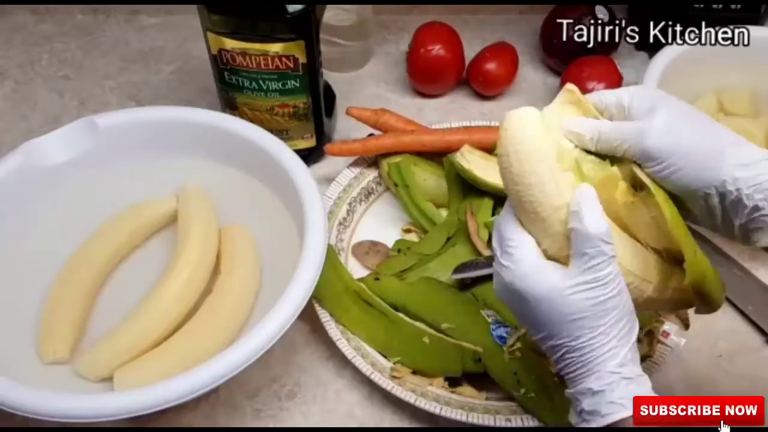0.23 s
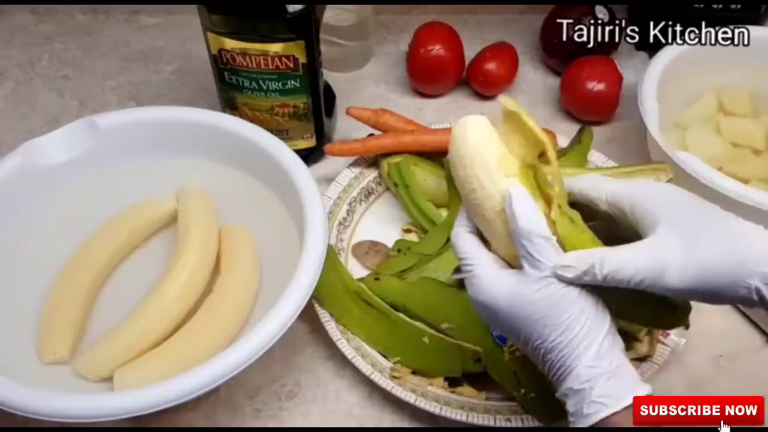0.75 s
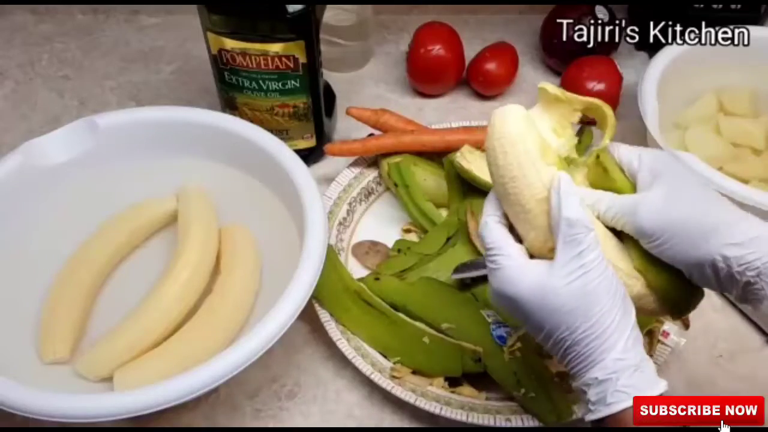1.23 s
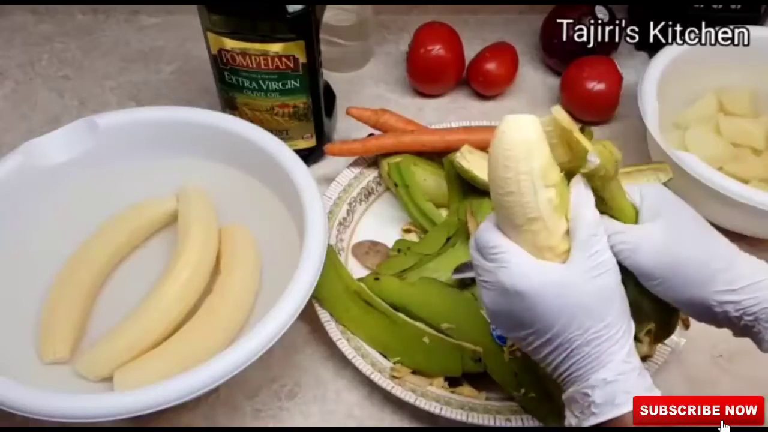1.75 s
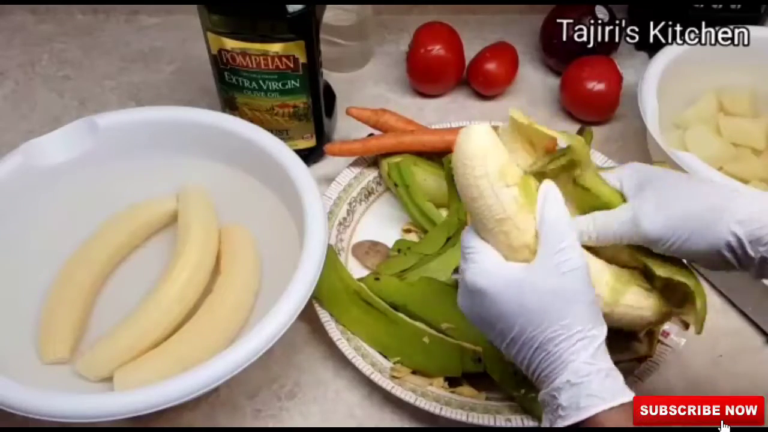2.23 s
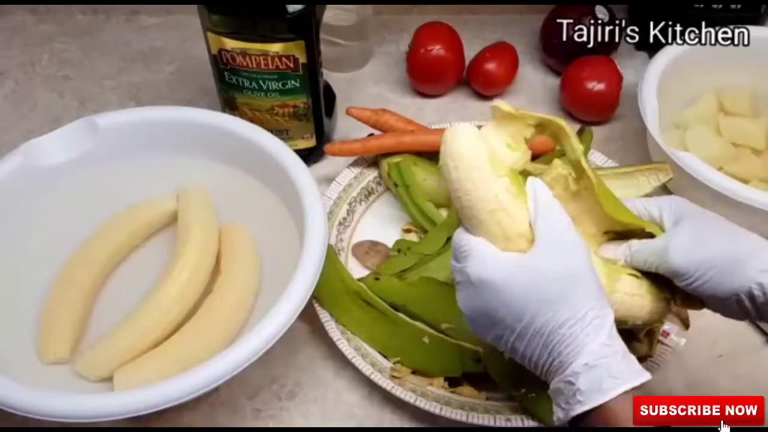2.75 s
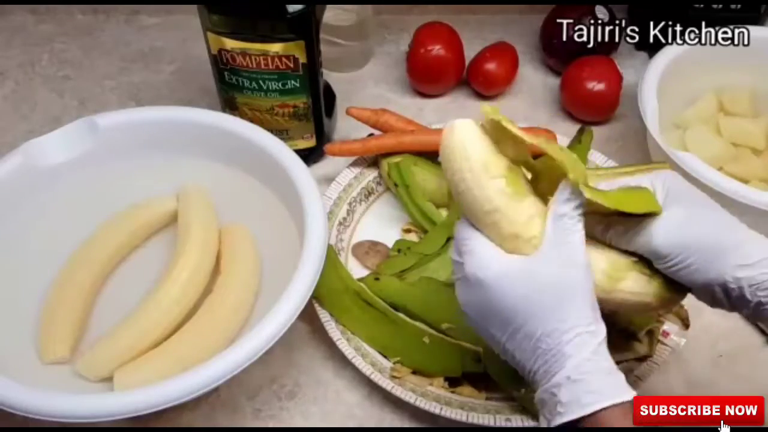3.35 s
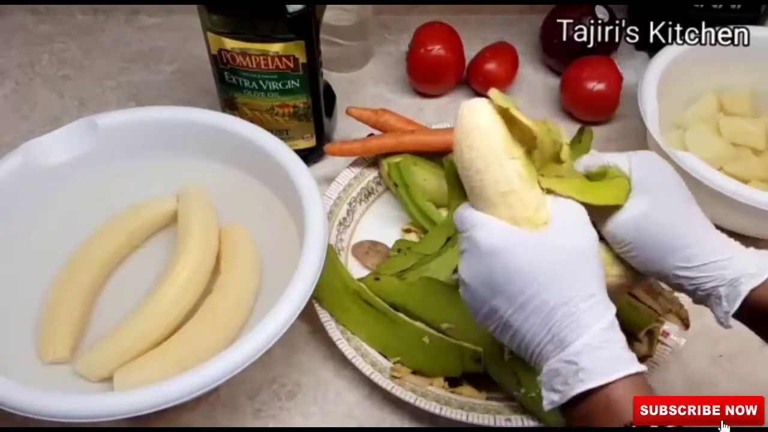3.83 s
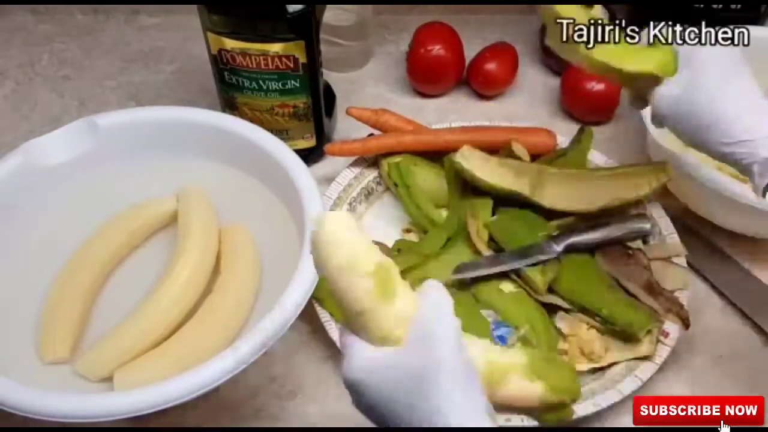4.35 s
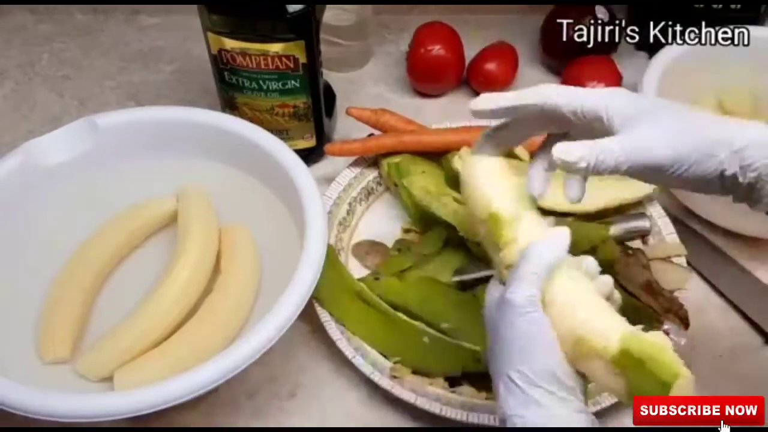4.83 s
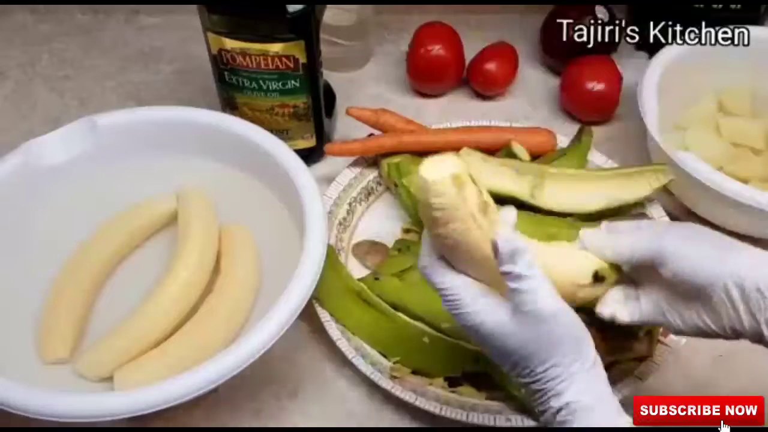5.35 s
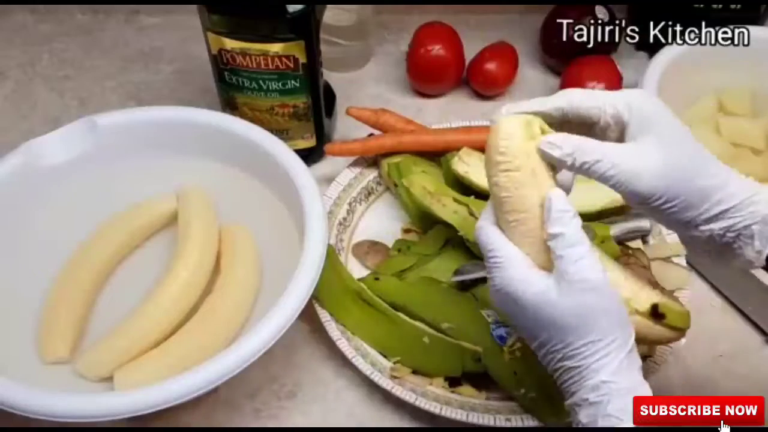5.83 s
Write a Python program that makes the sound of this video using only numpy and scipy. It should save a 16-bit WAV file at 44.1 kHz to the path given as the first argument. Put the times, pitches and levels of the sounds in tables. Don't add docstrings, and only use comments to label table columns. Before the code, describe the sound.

Gloved hands rip thick green skin off a plantain in crackling, snapping bursts, close up in a kitchen, over a low unsteady appliance rumble.

```python
import sys
import numpy as np
from scipy import signal
from scipy.fft import rfft, irfft, next_fast_len
from scipy.io import wavfile
from scipy.ndimage import uniform_filter1d

SR = 44100
rng = np.random.default_rng(int(sys.argv[2]) if len(sys.argv) > 2 else 0)


def master_out(mix):
    frames = np.transpose(np.atleast_2d(mix))
    ceiling = np.clip(frames, -1, 1)
    pcm = np.round(ceiling * 32767).astype(np.int16)
    wavfile.write(sys.argv[1], SR, pcm)


def boost(x):
    u = np.asarray(x, float) / 20
    return 10 ** u


N = 269010

# t/s, peak level/dB, time to gain 20 dB/s,
# time to lose 20 dB/s
STROKES = [(0.0, -37, .02, 0.045), (.04, -36.5, 0.018, 0.071), (.118, -23, 0.017, 0.09),
           (.33, -39, 0.016, 0.13), (.394, -37.5, 0.072, 0.035), (.558, -50, 0.047, 0.26),
           (.788, -49.5, 0.089, 0.31), (.945, -43, 0.01, 0.058), (1.12, -51, 0.067, 0.43),
           (1.215, -54, .015, 0.24), (1.304, -33, 0.13, 0.21), (1.654, -42.5, 0.16, 0.26),
           (1.906, -39, 0.035, 0.3), (2.055, -34, 0.074, 0.15), (2.184, -37.5, .025, 0.035),
           (2.225, -52.5, .04, 0.99), (2.42, -44, 0.023, 0.11), (2.484, -40.5, 0.1, 0.063),
           (2.694, -50.5, 0.0054, 0.15), (2.828, -33.5, 0.06, 0.053), (2.904, -35, 0.061, 0.073),
           (3.006, -28.5, 0.06, 0.065), (3.242, -52, 0.97, 0.12), (3.412, -42.5, 0.047, 0.075),
           (3.61, -40.5, 0.088, 0.14), (3.65, -35, 0.05, 0.089), (3.81, -57, .012, .08),
           (3.868, -43, 0.02, 0.15), (4.078, -38.5, 0.3, 0.26), (4.15, -41.5, 0.79, 0.18),
           (4.24, -30.5, 0.11, 0.088),
           (4.52, -61.5, 0.35, 0.39),
    (4.65, -54.5, 0.024, 0.43),
    (4.98, -56.5, 0.024, .15),
    (5.131, -42.5, 0.15, 0.031),
    (5.238, -52.5, 0.48, 0.17),
    (5.4, -60, 0.16, 0.47),
    (5.536, -50.5, 0.15, 0.064),
    (5.96, -50, 0.1, .2),
    (6.008, -45.5, 0.061, 0.061),
    (6.07, -42.5, 0.02, .3),
]
# t/s, peak level/dB, time to gain 20 dB/s, time to lose 20 dB/s
TEARS = [(.05, -51.5, 0.058, 0.13), (.125, -25.5, 0.017, 0.11), (.39, -33, 0.063, 0.057),
         (.6, -60.5, 0.9, 0.29), (.87, -57.5, 0.14, 1), (1.225, -34.5, 0.018, 0.39), (1.31, -33, 0.16, 0.2),
         (1.41, -40, .1, 0.063), (1.68, -59, 0.33, 0.42), (1.93, -52, 0.023, 0.1), (2.05, -24, 0.023, 0.11),
         (2.11, -46.5, .05, 0.43), (2.19, -42, .1, 0.083), (2.5, -47.5, 0.85, 0.079),
         (2.8, -35, 0.029, 0.11), (2.84, -37, 0.04, 0.033), (2.9, -30, 0.013, 0.029),
         (2.98, -28, .025, 0.034), (3.01, -21.5, .03, 0.023), (3.04, -38, .03, 0.13),
         (3.25, -47.5, 0.12, 0.057), (3.41, -45, 0.048, 0.091), (3.65, -34.5, 0.064, 0.13),
         (4.18, -37.5, 0.2, .1), (4.23, -21, 0.044, 0.074), (4.7, -50.5, 0.063, 0.1),
         (5.15, -58.5, 0.44, 0.5), (5.52, -63, 0.43, 0.24), (6.1, -48.5, 0.19, .1)]
# t/s, left over right level/dB
PLACE = [(0.0, -0.5), (0.44, 1.5), (1.07, -0.5), (2.62, 0), (2.74, -0.5), (2.79, 0), (3.79, 0.5),
         (4.4, 1.0), (4.45, 0), (5.39, -0.5), (5.72, 2.5), (6.1, -0.5)]
# f/Hz, level per Hz/dB
RUSTLE = [(1530, -24.5), (2600, -8), (2910, -12), (3420, -7.5), (4560, -3.5), (8200, -3.5), (14900, -4.5),
          (16000, -9.5)]
# f/Hz, width/Hz, level/dB
FRUIT = [(1080, 455, 2), (1149, 273, 6), (1600, 650, -3), (2048, 261.4, 0.5), (2350, 266, -2.5),
         (2876, 360, -3), (3520, 870, -7)]
# f/Hz, width/Hz, level/dB
HOLLOW = [(435.5, 74, 8.5), (589, 89, 3), (748, 40, 1), (870, 210, -6.5)]
GLOVE_REST_DB, RIP_REST_DB = -82, -70
FLEX_DB, FLEX_FOLLOWS = -73.5, 0.17

# t/s, peak level/dB, time to fade 60 dB/s, f/Hz
TICKS = [(.3235, -51, 0.059, 2040), (0.5545, -51, 0.053, 3940), (0.944, -45.5, 0.05, 3850),
         (1.092, -55.5, 0.067, 3000), (1.4073, -43, 0.095, 1110), (1.4593, -41.5, 0.033, 1850),
         (1.8627, -60, .04, 2110), (2.2127, -42.5, 0.058, 1750), (2.6925, -49.5, 0.025, 1190),
         (2.733, -48.5, 0.023, 1420), (4.206, -35.5, 0.05, 1840), (4.252, -34.5, 0.084, 1650),
         (4.669, -50.5, 0.034, 2840), (4.9795, -55, 0.051, 4290), (5.081, -50, 0.11, 4450),
         (5.886, -64, .062, 4430), (6.062, -41.5, 0.14, 3770)]
# t/s, peak level/dB, time to fade 60 dB/s, f/Hz
RIPS = [(0.0363, -32, 0.087, 4170), (0.11, -19.5, 0.021, 3900), (.122, -20, 0.15, 1300),
        (0.1831, -24.5, 0.061, 2780), (.346, -36, 0.13, 2100), (0.3946, -27, 0.026, 1700),
        (1.209, -31.5, 0.071, 1610), (1.2334, -23, 0.06, 3000), (1.2699, -21.5, 0.08, 1670),
        (1.3054, -24, 0.04, 1150), (1.5685, -49, .04, 3990), (1.9021, -37.5, 0.036, 2410),
        (2.05, -28, 0.057, 2200), (2.14, -30, 0.09, 1630), (2.4795, -35, 0.079, 2410),
        (2.7794, -27.5, 0.093, 1283), (3.237, -36, 0.048, 1530), (3.568, -54, 0.036, 1730),
        (3.598, -28.5, 0.14, 1600), (4.2191, -20, 0.12, 1460)]
# t/s, peak level/dB, time to fade 60 dB/s, f/Hz
SNAPS = [(1.335, -15, 0.07, 1560), (1.3734, -28.5, 0.075, 1900), (2.029, -41, .04, 1780),
         (2.043, -8, 0.07, 1900), (2.099, -20.5, 0.039, 1220), (2.104, -21.5, 0.036, 1950),
         (2.1782, -15, 0.031, 1940), (2.789, -19, 0.054, 1380), (2.8423, -23.5, 0.075, 1200),
         (2.9034, -16, 0.061, 1200), (2.9094, -19.5, 0.026, 1030), (2.973, -17, 0.05, 1760),
         (2.9799, -11.5, 0.16, 1320), (3.523, -41, 0.062, 2120)]
# t/s, peak level/dB, time to fade 60 dB/s, f/Hz
POPS = [
    (2.7756, -39, .031, 1260),
    (2.8244, -21, 0.063, 2500),
    (2.8887, -36, .049, 2220),
    (2.9922, -25, 0.017, 2370),
    (3.0029, -14, 0.028, 1590),
    (3.0098, -19, .05, 2350),
    (3.3838, -48, 0.055, 1780),
    (3.6408, -22.5, 0.11, 1580),
]
# bright spray re peak level/dB, hollow knock re peak level/dB
BLEND = [
    (3, -13.5),
    (-11, -19),
    (-23, -16.5),
    (-11.5, -8.5),
]

# t/s, peak level/dB, f/Hz, left over right level/dB
PINGS = [(0.0427, -41.5, 2780, 1), (0.122, -15.5, 2030, 1), (0.3486, -37.0, 1920, -2),
         (0.3672, -34.0, 2210, -1), (0.443, -45.0, 1710, 5), (0.8456, -50.0, 1810, -6),
         (0.8951, -48.0, 1690, -6), (0.9521, -47.0, 2290, -6), (1.2111, -30.0, 2140, -2),
         (1.3542, -31.5, 1860, -3), (1.4083, -30.5, 2130, -2), (1.4632, -37.0, 2290, 4),
         (1.9554, -33.5, 2270, -4), (2.0275, -30.0, 2100, 1), (2.1566, -30.5, 2320, 0),
         (2.3387, -42.0, 2060, -2), (2.3637, -42.5, 1930, 1), (2.454, -39.5, 2430, -6),
         (2.7741, -38.5, 1790, 1), (2.8429, -20.0, 1840, 2), (2.989, -14.5, 2180, -2),
         (3.0032, -11.5, 1760, 1), (3.2132, -47.5, 1660, 0), (3.2314, -43.0, 1730, 1),
         (3.4017, -44.0, 1610, 0), (3.5292, -47.5, 1710, -2), (3.5665, -34.0, 1760, -2),
         (3.5893, -30.5, 1990, -1), (3.5976, -24.0, 1980, 0), (3.6048, -27.5, 2000, -1),
         (3.6176, -29.5, 1700, 0), (3.6293, -29.0, 1610, 1), (3.6436, -25.0, 1600, -1),
         (3.6806, -33.5, 1710, 6), (3.9285, -43.5, 1890, -2), (4.2203, -24.0, 1950, -3),
         (4.6668, -49.5, 2520, -2), (4.6937, -47.5, 2710, 2), (4.697, -46.0, 2760, -6),
         (5.0986, -44.0, 2690, -1)]
# t/s, peak level/dB, left over right level/dB
PRICKS = [(0.0346, -28.0, -6), (0.038, -24.0, -4), (0.0456, -30.0, -6), (0.0739, -33.0, -5),
          (0.0969, -28.0, -5), (0.1237, -14.5, -6), (0.317, -39.5, -4), (0.3449, -31.0, -2),
          (0.3992, -26.5, 6), (0.5556, -30.0, 0), (0.5634, -36.0, -2), (0.6283, -46.0, -1),
          (1.111, -41.0, -4), (1.2108, -24.5, -2), (1.3743, -26.5, -6), (1.4116, -25.5, -6),
          (1.5682, -41.0, -5), (1.8445, -46.5, 0), (1.8632, -41.5, -6), (2.0996, -26.5, 1),
          (2.1869, -28.0, -1), (2.2227, -27.0, -6), (2.6011, -48.5, -2), (2.6341, -50.0, -6),
          (2.6575, -43.5, -6), (2.6922, -29.0, -1), (2.7199, -40.5, -4), (2.7326, -27.0, -6),
          (2.7743, -33.5, -5), (2.8285, -18.0, -5), (3.1267, -42.0, -6), (3.2091, -42.0, -5),
          (3.2339, -38.5, -4), (3.6068, -27.5, -1), (3.7322, -33.0, -6), (3.8049, -39.0, -6),
          (3.8243, -39.5, -6), (3.8388, -33.5, -6), (3.8646, -32.5, -6), (4.7526, -45.5, 1),
          (4.9694, -48.5, -6), (5.0989, -33.5, -6), (5.2583, -44.0, -2), (5.8864, -45.5, -1),
          (5.9024, -44.5, -3), (5.9211, -42.0, 2), (5.9426, -37.0, 0), (5.9687, -33.0, 0),
          (5.982, -30.0, -5), (6.0019, -28.0, -4), (6.0968, -27.5, -3)]
# t/s, peak level/dB, f/Hz, left over right level/dB
BREAKS = [
    (1.305, -20, 1500, 0),
    (1.3355, -19, 1600, 0),
    (2.0418, -6, 2200, -2),
    (2.0992, -21, 1500, -1),
    (2.1785, -18, 2000, -1),
    (2.7878, -22, 1500, 0),
    (2.9035, -18, 1400, 0),
    (2.9793, -16, 1500, 0),
    (.3955, -30, 1700, 2),
]
PING_WIDTH_HZ, PING_BREAK_S, PING_DB = 800, .0003, 1
PRICK_HZ, PRICK_BREAK_S, PRICK_DB = 5000, .0005, 3

# start t/s, end t/s, f/Hz, width/Hz, level/dB
RUBS = [(0.777, 0.943, 1750, 700, -61), (1.58, 1.7, 4620, 1800, -47.5), (1.879, 2.026, 2134, 1300, -45),
        (2.303, 2.502, 1600, 500, -63), (3.535, 3.71, 1773, 1130, -45.5), (3.84, 4.23, 1870, 1370, -51.5),
        (4.866, 5.294, 1550, 58.8, -71), (5.054, 5.263, 2426, 905, -57.5), (5.8, 5.88, 5480, 3000, -60.5),
        (5.92, 6.045, 12500, 6000, -50), (0.528, 0.603, 5600, 2200, -53.5), (.72, .84, 6000, 3000, -55),
        (1.09, 1.2, 12000, 5000, -54.5), (2.633, 2.675, 11000, 5000, -60), (3.645, 3.694, 12000, 3000, -40),
        (3.803, 3.865, 10500, 5000, -50), (5.918, 6.032, 6600, 1500, -48), (0.066, 0.116, 5000, 4000, -45),
        (6.054, 6.1, 11500, 5000, -43), (1.25, 1.41, 4000, 2500, -45), (4.19, 4.283, 4000, 2500, -41.5)]
# t/s, peak level/dB, f/Hz
THUDS = [
    (2.998, -36, 200),
    (4.215, -31, 60),
    (4.728, -26, 70),
]

LAG_SAMPLES = 4
SHADOW_HZ, SHADOW_SHARE = 8000, .3
KITCHEN_T60_S, WALL_CUT_HZ, KITCHEN_DB = 0.32, 5900, -14.5

# t/s, drone level/dB, time to gain or lose 20 dB/s, upper rumble re drone level/dB
SURGES = [(.08, -48, 0.23, 3), (.22, -36.5, 0.03, -15), (.34, -39, 0.2, -12), (.58, -53.5, 1, 0),
          (.95, -53.5, 3.5, -4), (1.14, -43, 0.54, -8), (1.43, -42, 0.2, -14), (1.61, -36, 0.24, -14),
          (1.83, -39, 0, -13.5), (1.95, -46, 0.43, -11), (2.36, -47.5, 0.3, -7.5), (2.52, -54, 0.5, -6),
          (3.05, -52.5, 0.23, -1), (3.361, -51, 0.5, -4.5), (3.518, -49.5, -0.9, -14),
          (3.8, -46, 0.17, -5.5), (4.04, -40, .1, -14.5), (4.26, -36, .1, -17), (4.47, -50, 0.57, -24),
          (4.538, -34, 0.1, -26.5), (4.74, -39.5, 0.05, -2), (4.94, -33, -0.02, -12),
          (5.19, -46, 0.84, -7.5), (5.33, -39, -0.3, -9.5), (5.39, -49, -0.26, 5), (5.62, -23.5, -2, -1),
          (5.828, -41.5, 0.77, -8.5), (5.93, -63, -1.3, -6), (6.05, -31.5, -0.8, -9.5)]
# f/Hz, width/Hz, level/dB
DRONE = [(53.95, 12, -0.5), (59.33, 15, 1.5)]
# f/Hz, width/Hz, level/dB
SKIRT = [(48.3, 16, 0)]
# f/Hz, width/Hz, level/dB
UPPER = [(90.8, 35.3, 11), (136, 7, -22.5)]
IDLE_DB, UPPER_SLOWER, THROB_DB = -62, 1.32, 1.8

# f/Hz, level per Hz/dB
AIR = [(90, -19.5), (140, -11), (280, -11.5), (420, -26.5), (800, -24), (4000, -40), (8500, -44),
       (14000, -34.5)]
AIR_DB = -62.5
MURMUR_HZ, MURMUR_FOLLOWS, MURMUR_PATCHY_DB = 340, .45, 2.2


def rms_one(x):
    return x / np.sqrt(np.mean(x ** 2) + 1e-20)


def butter(order, hz, kind, x):
    return signal.sosfilt(signal.butter(order, hz, kind, fs=SR, output="sos"), x)


def drift(rate):
    r = np.exp(-80 * np.pi * rate / SR)
    white = rng.standard_normal(N // 40 + 2002)
    slow = signal.lfilter([1], [1, -2 * r, r * r], white)[2000:]
    return np.interp(np.arange(N) / 40, np.arange(len(slow)), rms_one(slow))


def swells(rows, rest_db):
    t = np.arange(0, N + 40, 40) / SR
    s, db, rise, fall = np.transpose(rows)[:, :, None]
    before = (s - t) / np.maximum(rise, .004)
    after = (t - s) / np.maximum(fall, .004)
    away = np.maximum(before, after)
    power = boost(2 * rest_db) + boost(2 * (db - 20 * away)).sum(axis=0)
    return np.interp(np.arange(N) / SR, t, 10 * np.log10(power))


def resonate(x, modes, spread_db=0):
    out = 0
    offsets = spread_db + np.zeros(len(modes))
    for k, ((hz, width, db), offset) in enumerate(zip(modes, offsets)):
        r = np.exp(-np.pi * width / SR)
        b = np.array([1, 0, -1]) * (1 - r * r) / 2
        a = [1, -2 * r * np.cos(2 * np.pi * hz / SR), r * r]
        out = out + (-1) ** k * boost(db + offset) * signal.lfilter(b, a, x)
    return out


def coloured(x, spectrum):
    hz, db = np.transpose(spectrum)
    size = next_fast_len(N)
    grid = np.maximum(np.arange(size // 2 + 1) * SR / size, 1)
    gain = boost(np.interp(np.log(grid), np.log(hz), db))
    return rms_one(irfft(rfft(x, size) * gain, size)[:, :N])


def grains(per_s, uneven_db, alike):
    sizes = boost(uneven_db * np.minimum(rng.exponential(1, (3, N)), 5))
    sizes = sizes * rng.choice([-1, 1], (3, N))
    clicks = sizes * (rng.random((3, N)) < per_s / SR) + 1e-18
    return np.sqrt(alike) * clicks[0] + np.sqrt(1 - alike) * clicks[1:]


def sides(pan_db):
    return boost(np.multiply.outer([.5, -.5], pan_db))


def hand_place():
    s, pan_db = np.transpose(PLACE)
    return np.interp(np.arange(N) / SR, s, pan_db)


def hands():
    rustle_db = swells(STROKES, GLOVE_REST_DB)
    rip_db = swells(TEARS, RIP_REST_DB)
    flex_db = FLEX_DB + FLEX_FOLLOWS * (rip_db + 50)
    clumps_db = 0.76 * drift(42)
    rustle = coloured(grains(14000, 2.3, alike=0.071), RUSTLE)
    rip = rms_one(resonate(grains(1500, 4.0, alike=0.45), FRUIT))
    flex = rms_one(resonate(grains(1200, 3.0, alike=.85), HOLLOW))
    rustle = boost(rustle_db + clumps_db) * rustle
    rip = boost(rip_db - 5.5 + 2.8 * clumps_db) * rip
    flex = boost(flex_db + 1.2 * clumps_db) * flex
    return sides(hand_place()) * (rustle + rip) + flex


def cracks():
    size = 5000
    out, t = np.zeros((2, N + size)), np.arange(size) / SR
    mode_hz, pan_db = np.transpose(FRUIT)[0], hand_place()
    kinds = zip((TICKS, RIPS, SNAPS, POPS), BLEND)
    rows = [row + blend for kind, blend in kinds for row in kind]
    for s, peak_db, t60, hz, spray_db, knock_db in rows:
        chance = rng.standard_normal((5, size))
        fade = boost(-60 * t / np.clip(t60, .005, .12))
        shower = (chance[0] + 0.99 * chance[1:3]) * (np.abs(chance[3]) > 2.1) * fade
        shower[:, 0] += 4.5
        ring = resonate(shower, FRUIT, -12 * np.abs(np.log2(mode_hz / hz)))
        build = 1 - 0.55 * np.exp(-t / 0.0012)
        spray = butter(2, 3500, "high", (chance[4] + 2.5 * chance[1:3]) * fade * build)
        knock = resonate(signal.lfilter([1, -1], [1, -.95], shower), HOLLOW)
        levels_db = [peak_db, peak_db + spray_db + 15.0, peak_db + knock_db + .1]
        at = round(s * SR)
        for part, db in zip((ring, spray, knock), levels_db):
            out[:, at:at + size] += sides(pan_db[at])[:, None] * boost(db) * part / np.abs(part).max()
    return out[:, :N]


def fibres():
    size = 600
    out, t = np.zeros((2, N + size)), np.arange(size) / SR
    thin = [(s, db, 0, pan_db) for s, db, pan_db in PRICKS]
    for s, db, hz, pan_db in PINGS + thin + BREAKS:
        chance = rng.standard_normal((3, size))
        if hz:
            band = [(hz, PING_WIDTH_HZ, 0)]
            burst = (chance[0] + .4 * chance[1:]) * np.exp(-t / PING_BREAK_S)
            part = resonate(resonate(burst, band), band)
            db = db + PING_DB
        else:
            burst = (chance[0] + .9 * chance[1:]) * np.exp(-t / PRICK_BREAK_S)
            part = butter(2, PRICK_HZ, "high", burst)
            db = db + PRICK_DB
        part = part / np.abs(part).max(axis=1, keepdims=True)
        at = round(s * SR)
        out[:, at:at + size] += sides(pan_db)[:, None] * boost(db) * part
    out[0] = np.roll(out[0], LAG_SAMPLES)
    return out[:, :N]


def rubs():
    out, t = 0, np.arange(N) / SR
    slips = grains(4000, 2.6, alike=0.53)
    for start, end, hz, width, db in RUBS:
        band = [(hz, width, 0)]
        done = np.clip((t - start) / (end - start), 0, 1)
        swell = np.sqrt(np.sin(np.pi * done ** 1.11) + 1e-9)
        out = out + boost(db) * swell * rms_one(resonate(resonate(slips, band), band))
    return out


def thuds():
    out, t = np.zeros(N), np.arange(N) / SR
    for s, db, hz in THUDS:
        turns = np.maximum(t - s, 0) * hz
        out += boost(db) * turns * np.exp(-1.2 * turns) * np.sin(2 * np.pi * turns)
    return out


def counter(x):
    lags = [SR * (path_s + .0002 * drift(1.5)) for path_s in (.0011, .0013)]
    n = np.arange(N)
    echo = np.array([np.interp(n - lag, n, port) for lag, port in zip(lags, x)])
    return x + boost(-7.5) * echo


def kitchen(x):
    out, dull = np.zeros((2, N)), np.exp(-2 * np.pi * WALL_CUT_HZ / SR)
    lags = (rng.uniform(.008, .03, 12) * SR).astype(int)
    for k, lag in enumerate(lags):
        loop, gain, state = x.copy(), boost(-60 * lag / SR / KITCHEN_T60_S), [0.]
        for i in range(lag, N, lag):
            back, state = signal.lfilter([gain * (1 - dull)], [1, -dull], loop[i - lag:i], zi=state)
            loop[i:i + lag] += back[:N - i]
        out[k % 2] += (loop - x) * (-1) ** (k // 2)
    return out


def appliance_load():
    drone = [(s, db, span, span) for s, db, span, _ in SURGES]
    upper = [(s, db + up, UPPER_SLOWER * span, UPPER_SLOWER * span) for s, db, span, up in SURGES]
    return swells(drone, IDLE_DB), swells(upper, IDLE_DB)


def rumble():
    out = 0
    for modes, db, own in zip((DRONE, UPPER), appliance_load(), (.11, .26)):
        db = uniform_filter1d(db, size=1500)
        white = rng.standard_normal((3, N + SR))
        white = white[0] + own * white[1:]
        tone = rms_one(resonate(resonate(white, modes), modes))
        tone = tone + boost(-16.0) * rms_one(resonate(white, SKIRT))
        swell = np.sqrt(uniform_filter1d(tone[0] ** 2, size=2400) + .01)
        out = out + boost(db + THROB_DB * drift(7)) * (tone / swell)[:, SR:]
    return butter(2, 260, "low", out)


def air():
    white = rng.standard_normal((3, N))
    shared = butter(1, 900, "low", white[0])
    own = butter(1, 900, "high", white[1:])
    hiss = boost(AIR_DB + 1.1 * drift(1.5)) * coloured(shared + own, AIR)
    load_db = appliance_load()[1]
    murmur = signal.sosfiltfilt(signal.butter(3, MURMUR_HZ, fs=SR, output="sos"), hiss)
    murmur_db = MURMUR_FOLLOWS * (load_db - load_db.mean()) + MURMUR_PATCHY_DB * drift(3.8)
    return hiss + murmur * (boost(murmur_db) - 1)


def scene():
    bursts = cracks()
    near = counter(hands() + rubs() + bursts)
    near[0] = np.roll(near[0], LAG_SAMPLES)
    treble = signal.butter(1, SHADOW_HZ, "high", fs=SR, output="sos")
    near[0] -= SHADOW_SHARE * signal.sosfiltfilt(treble, near[0])
    thinned = signal.lfilter([1, -1], [1, -.93], bursts.mean(axis=0))
    echoes = boost(KITCHEN_DB) * kitchen(thinned)
    return near + fibres() + thuds() + echoes + rumble() + air()


def roll_off(x):
    return signal.sosfilt(signal.butter(12, 16700, fs=SR, output="sos"), x)


def record(dry):
    steep = signal.ellip(10, .5, 40, 15620, fs=SR, output="sos")
    mix = signal.sosfilt(steep, dry)
    return roll_off(mix)


dry = scene()
out = record(dry)
master_out(out)
```